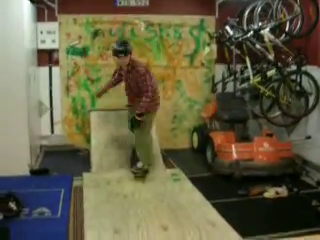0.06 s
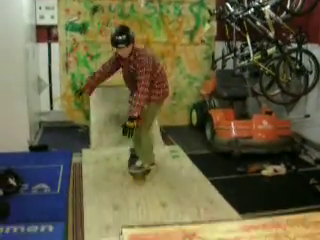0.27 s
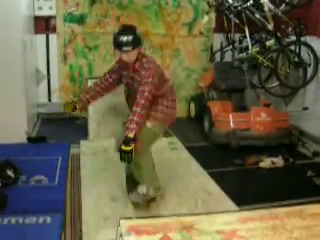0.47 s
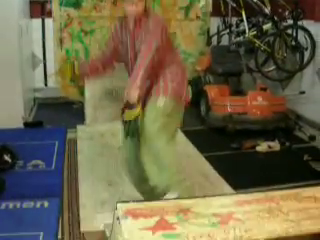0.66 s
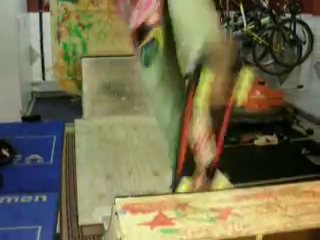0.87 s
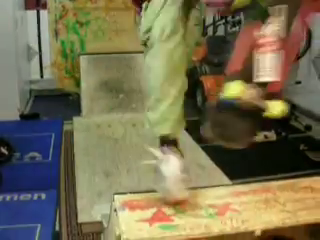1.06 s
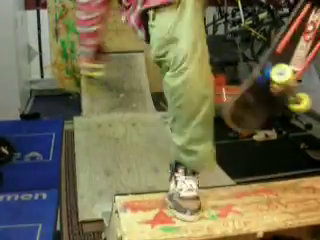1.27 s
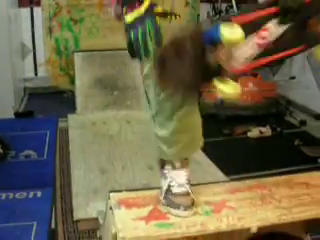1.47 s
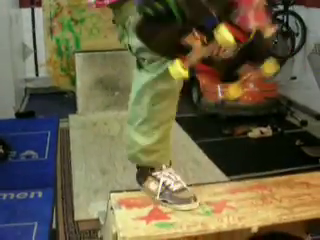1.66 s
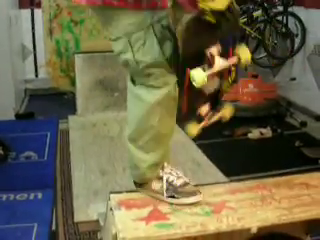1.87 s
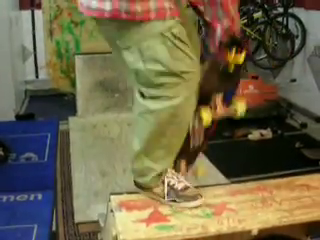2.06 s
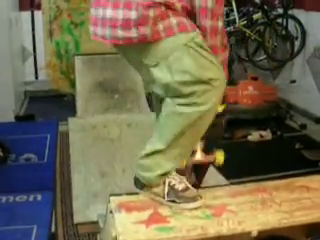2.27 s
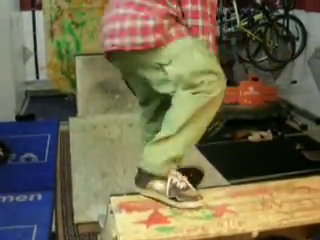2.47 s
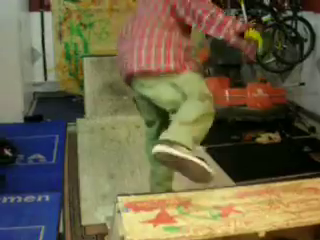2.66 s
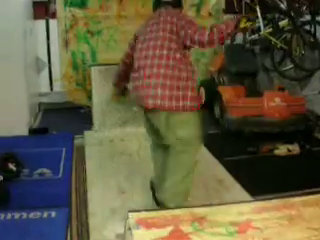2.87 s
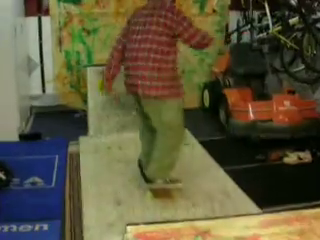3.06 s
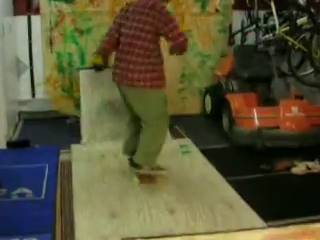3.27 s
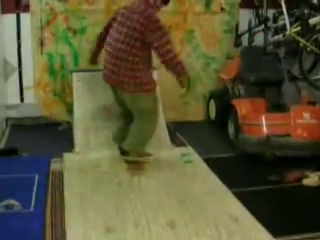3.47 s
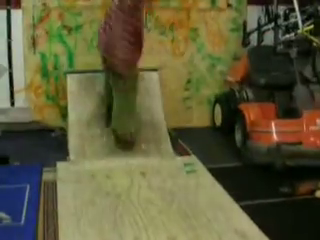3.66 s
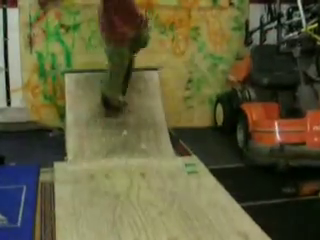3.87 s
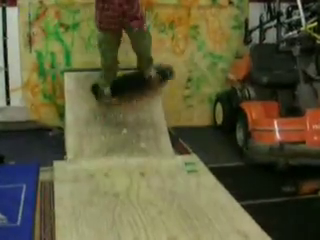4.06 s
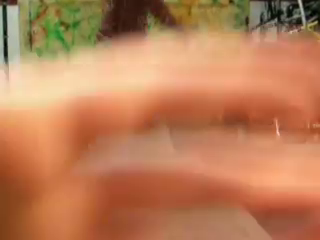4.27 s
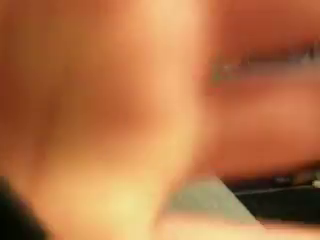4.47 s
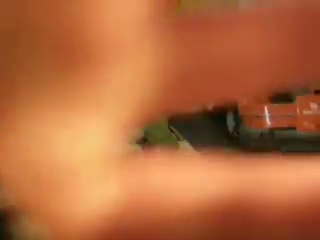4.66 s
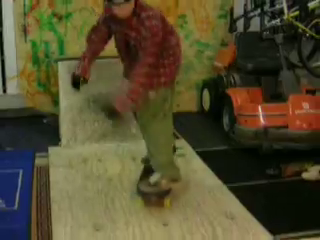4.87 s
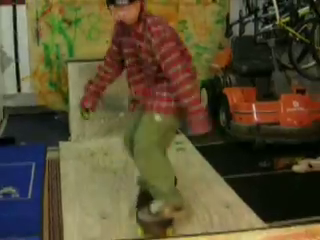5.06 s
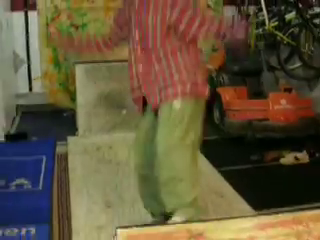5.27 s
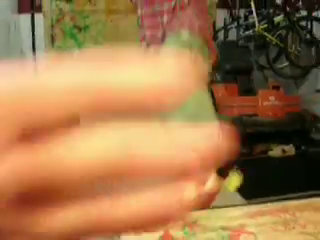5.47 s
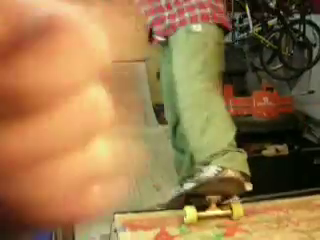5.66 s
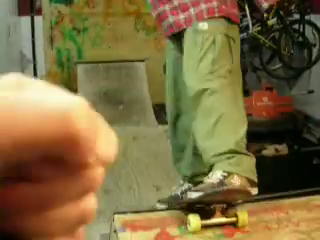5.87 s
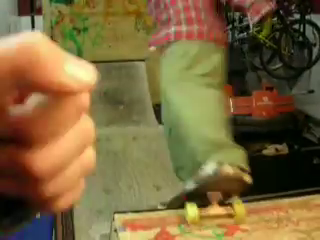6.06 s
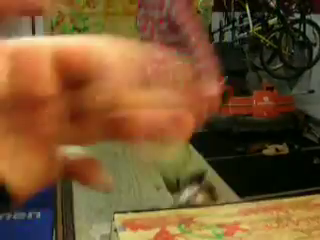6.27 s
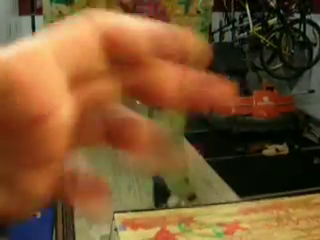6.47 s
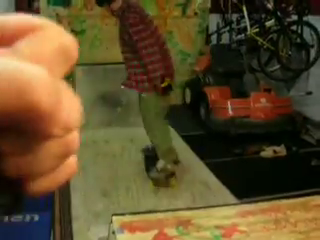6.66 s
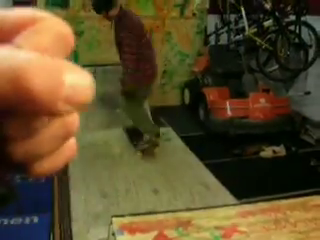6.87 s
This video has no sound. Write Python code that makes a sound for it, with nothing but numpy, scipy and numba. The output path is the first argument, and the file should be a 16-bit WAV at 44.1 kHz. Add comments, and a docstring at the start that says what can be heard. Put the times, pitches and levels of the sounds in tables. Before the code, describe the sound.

Skateboard wheels rumble back and forth over a wooden ramp indoors, with sharp clacks and booming knocks of the board on plywood.

```python
"""Skateboard wheels rumble over plywood and knock across the seams, between two ramps in a garage.
The rider steps onto the platform and picks the board up, wheels still spinning and trucks flopping,
then drops in, turns on the far ramp and stalls on the near edge. Hard contacts crack, ring the maple
deck and boom in the ramp. A narrow-band microphone stands close by and overloads on the hardest knocks."""
import sys
import numpy as np
from scipy import signal
from scipy.fft import rfft, irfft, next_fast_len
from scipy.io import wavfile
from scipy.ndimage import uniform_filter1d
from numba import njit

SR = 44100
rng = np.random.default_rng(int(sys.argv[2]) if len(sys.argv) > 2 else 0)


def generate_wav(signal):
    """Clip the signal to [-1, 1] and save it as 16-bit WAV at the path in sys.argv[1]."""
    frames = np.transpose(np.atleast_2d(signal))
    scaled = np.clip(frames, -1, 1) * 32767
    pcm = np.round(scaled).astype(np.int16)
    wavfile.write(sys.argv[1], SR, pcm)


N = 306054
TIME = np.arange(N) / SR


def undb(db):
    """Decibels to gain."""
    return 10 ** (np.asarray(db) / 20)


def unit(x):
    """Scale to rms 1."""
    return x / np.sqrt(np.mean(x ** 2))


def unit_blow(x):
    """Scale so that the first 20 ms have rms 1."""
    return x / np.sqrt(np.mean(x[:SR // 50] ** 2))


def add(out, start_s, x):
    """Mix x into out, starting at start_s."""
    i = max(int(start_s * SR), 0)
    out[i:i + len(x)] += x[:max(len(out) - i, 0)]


def shape(x, response):
    """Filter x by a function of frequency."""
    size = next_fast_len(len(x) + SR // 4)
    hz = np.maximum(np.fft.rfftfreq(size, 1 / SR), 1)
    return irfft(rfft(x, size) * response(hz), size)[:len(x)]


def colour(x, points):
    """Filter x by a curve through (frequency [Hz], gain [dB]) points."""
    point_hz, db = np.transpose(points)
    return shape(x, lambda hz: undb(np.interp(np.log(hz), np.log(point_hz), db)))


def gate(start, end, rise, fade):
    """Rise, hold until the end, then die away; all in seconds."""
    return np.clip((TIME - start) / rise, 0, 1) * np.exp(-np.maximum(TIME - end, 0) / fade)


def wander(rate_hz):
    """A random drift with a spread near 1."""
    knots = rng.standard_normal(2048)
    return 1.2 * np.interp(TIME * rate_hz, np.arange(len(knots)), knots)


def grit(per_s, spread_db):
    """Tiny contacts at random moments, a few of them much stronger than the rest."""
    happens = rng.random(N) < per_s / SR
    contacts = happens * rng.standard_normal(N)
    strength = undb(spread_db * np.minimum(rng.exponential(size=N), 4))
    return unit(contacts * strength)


def plywood(force, low_cut_hz=190, thud_db=-13):
    """The ramp's sheets ring over the frame's dull thud; the ringing is heard with its deep bass cut."""
    # resonances of the sheets: (frequency [Hz], width [Hz], gain [dB])
    sheet_modes = [(118.6, 4, 7), (194, 6.7, -12.5), (242.5, 69, 6.5), (283.7, 42, 1.5), (316, 51, -0.5),
                   (366, 26, 4), (433.6, 34, 3), (540, 11, -6.5), (540.6, 66, 1.5), (622.5, 6.7, -2.5),
                   (806, 41, -12), (855, 40, -29)]
    # spectrum of the frame: (frequency [Hz], gain [dB])
    frame_colour = [(30, -45.5), (60, -21.5), (90, -3.5), (130, 10), (230, -11), (400, 3), (900, -3.5),
                    (2500, -41.5)]
    rings = sum(undb(db) * signal.lfilter(*signal.iirpeak(hz, hz / width, fs=SR), force)
                for hz, width, db in sheet_modes)
    rings = signal.sosfilt(signal.butter(2, [low_cut_hz, 1100], "band", fs=SR, output="sos"), rings)
    thud = undb(thud_db) * colour(force, frame_colour)
    # bending waves are slower the lower they are, so the bass arrives a few ms late
    return shape(rings + thud, lambda hz: (hz / 1000) ** (-2j * np.pi * 1.6))


def wheels(uneven_db=1.44, touch_s=0.018, spin_rise_s=0.16, spin_stop_s=0.068, run_down_db_per_s=13.5):
    """Wheels on the wood's grain shake the ramp; treads hiss; bearings whirr and run down in the air."""
    # the rider presses into a bend of the ramp: (time [s], half width [s], extra level [dB])
    pushes = [(0.646, 0.07, 9.5), (3.46, 0.11, 8.5), (5.235, 0.041, 10), (6.51, 0.069, 10.5),
              (6.918, 0.12, 9)]
    # wheels down on the wood: (start [s], end [s], fade [s], rumble [dB], whirr [dB], hiss [dB])
    rides = [(0, 0.8, 0.34, -23.5, -33.5, -60), (2.409, 2.565, 0.12, -19.5, -38.5, -24.5),
             (2.791, 3.688, .16, -26.5, -34, -34.5), (3.857, 4.404, 0.019, -46.5, -40, -36.5),
             (4.558, 5.251, 0.016, -23, -29.5, -28), (5.418, 5.686, 0.054, -38.5, -45.5, -36),
             (6.275, 6.937, 0.086, -25.5, -32.5, -31.5)]
    # wheels spinning free: (start [s], end [s], whirr [dB])
    spins = [(1.1, 1.52, -27), (1.496, 2.253, -23), (4.122, 4.366, -36)]
    # spectrum of the bearings: (frequency [Hz], gain [dB])
    bearing_colour = [(200, -38.5), (500, -6), (800, -1), (1100, -2), (1750, -2), (2300, -9.5),
                      (3000, -27.5), (4000, -26.5)]
    # spectrum of the treads on the wood: (frequency [Hz], gain [dB])
    tread_colour = [(900, -29.5), (1800, -6), (2500, 1), (3300, 1.5), (4200, -3.5)]
    weight = undb(sum(db * np.exp(-((TIME - s) / width) ** 2) for s, width, db in pushes))
    rumble, whirr, hiss = sum(np.outer(undb(db), gate(start, end, touch_s, fade))
                              for start, end, fade, *db in rides)
    spin = np.zeros(N)
    for start, end, db in spins:
        run_down_db = run_down_db_per_s * np.maximum(TIME - start, 0)
        spin += gate(start, end, spin_rise_s, spin_stop_s) * undb(db - run_down_db)
    # uneven wheels press harder and softer
    load = undb(uneven_db * wander(rate_hz=45))
    ramp = unit(plywood(grit(per_s=3000, spread_db=1.5) * load))
    bearings = unit(colour(grit(per_s=2500, spread_db=2.5) * load, bearing_colour))
    treads = unit(colour(grit(per_s=3000, spread_db=3) * load, tread_colour))
    return weight * (ramp * rumble + bearings * whirr + treads * hiss) + bearings * spin


def scuffs():
    """Shoes, grip tape and wheels rub: dense slips that swell and die away."""
    # short rubs: (time [s], rise [s], fade [s], level [dB])
    rubs = [(0, 0.0013, 0.049, -16), (1.234, 0.059, 0.018, -20), (1.622, 0.019, 0.036, -22),
            (1.719, 0.034, 0.057, -23.5), (1.947, .021, 0.021, -13.5), (2.691, 0.19, 0.059, -17.5),
            (4.163, 0.044, .045, -19), (5.6, .01, 0.032, -34), (6.099, 0.0034, 0.038, -21)]
    # spectrum of a rub: (frequency [Hz], gain [dB])
    rub_colour = [(100, -33.5), (250, -6.5), (650, -7), (1100, -6), (1700, -9.5), (2500, -8), (3300, -18.5),
                  (4200, -13)]
    pressure = sum(undb(db) * gate(s, s + rise, rise, fade) for s, rise, fade, db in rubs)
    return pressure * unit(colour(grit(per_s=2500, spread_db=2.5), rub_colour))


def room_tone(level_db=-38):
    """The garage's faint, even hush under everything."""
    # spectrum of the hush: (frequency [Hz], gain [dB])
    hush_colour = [(40, -23), (150, -12.5), (280, -0.5), (420, -7.5), (650, -7.5), (900, -9), (2000, -12.5),
                   (4000, -12)]
    return undb(level_db) * unit(colour(rng.standard_normal(N), hush_colour))


def burst(t, length_s):
    """A short scatter of contacts that holds every frequency about equally."""
    envelope = np.exp(-(t / length_s) ** 1.5)
    spectrum = rfft(rng.standard_normal(len(t)) * envelope)
    return irfft(spectrum / abs(spectrum), len(t)) * np.sqrt(envelope)


def ring(t, modes, detune=0, onset_s=.001):
    """Struck modes die away from random phases; detune is their relative scatter in pitch."""
    hz, db, t60 = np.transpose(modes)[:, :, None]
    if detune:
        hz = hz * (1 + detune * rng.standard_normal(hz.shape))
    swing = np.sin(2 * np.pi * (hz * t + rng.random(hz.shape)))
    decay = undb(db - 60 * t / t60)
    return unit_blow(np.sum(decay * swing, axis=0) * np.minimum(t / onset_s, 1))


def knocks(push_s=0.026, shake_db=-26, rattle_s=.014):
    """Each blow cracks at the contact, rings the deck and pushes the ramp; loose trucks chatter after."""
    # wheels and deck striking the wood:
    # (time [s], clack [dB], deck ring [dB], ramp boom [dB], crack [dB], rattle share [0-1])
    blows = [(0.0679, -12, -20, -12.5, -33, .3), (0.0831, -15, -12.5, -6.5, -32, .65),
             (0.1755, -12, -14, -22, -27, 0.75), (0.2689, -15, -11.5, -25, -30, 0.2),
             (0.435, -34, -18.5, -12.5, -38, 0.2), (0.5471, -25.5, -13.5, -11.5, -33.5, 0.1),
             (0.6848, -15, -12, -12.5, -9, 0.06), (0.7621, -25.5, -15.5, -20, -35, 0.2),
             (0.892, -13.5, -22.5, -24, -20.5, 0.2), (1, -17, -18, -24.5, -37.5, 0.76),
             (1.046, -21, -23, -18, -28.5, 0.78), (2.2665, -10, -11, -9, -10, 0.41),
             (2.3349, -30.5, -19, -16.5, -25, .5), (2.4094, -17, -20, -20, -14.5, 0.82),
             (2.526, -23, -18, -19.5, -15.5, 0.8), (2.5433, -15.5, -20.5, -23.5, -20.5, 0.3),
             (2.8543, -33, -16, -15, -12, .2), (2.983, -20, -22.5, -19.5, -15.5, 0.99),
             (3.488, -16.5, -17, -17.5, -36.5, 0.15), (3.5879, -15, -18, -31, -4.5, 0.7),
             (3.703, -20, -18, -29, -10.5, 0.77), (4.4002, -15, -28.5, -19, -9, 0.54),
             (4.4165, -20.5, -20.5, -15, -14.5, 0), (4.591, -18.5, -18, -15, -15.5, 0.22),
             (4.6094, -31, -25, -17.5, -14, 0.8), (4.7248, -12, -12, -23, -30, 0),
             (4.9429, -20.5, -34.5, -13, -35, .2), (5.1015, -22, -34, -16.5, -26, 0.8),
             (5.2035, -21.5, -18.5, -13, -28, 0.43), (5.2787, -28, -20, -38, -8, 0.2),
             (5.3815, -24.5, -20.5, -22.5, -10, 0), (5.7355, -16.5, -14.5, -21.5, -6.5, .04),
             (6.1343, -25.5, -16, -24, -26.5, 0.6), (6.257, -16, -16.5, -21, -16, 0.2),
             (6.297, -17, -22.5, -14.5, -13.5, 0.54), (6.4868, -24, -19.5, -13.5, -23.5, .9),
             (6.5892, -20.5, -22, -13.5, -16.5, 0.1)]
    # bending modes of the maple deck: (frequency [Hz], level [dB], t60 [s])
    deck_modes = [(605, -13.5, 0.17), (675, 5.5, 0.041), (816, 8, 0.018), (1049, -10, 0.1)]
    # upper modes of wood and trucks, too close to tell apart: (frequency [Hz], gain [dB])
    clack_colour = [(300, -31.5), (700, 5), (1000, 2.5), (1400, 2), (1900, -1), (2600, -8.5), (3100, -22.5),
                    (3800, -19)]
    # spectrum of the hard contact: (frequency [Hz], gain [dB])
    crack_colour = [(600, -34.5), (1400, -7.5), (2200, -6), (2800, -6), (3400, -6.5), (4200, -4)]
    out, t = np.zeros(N), np.arange(8192) / SR
    for s, clack_db, ring_db, boom_db, crack_db, rattle in blows:
        chatter_s = np.cumsum(rattle_s * (.5 + rng.random(2)) / 2)
        for delay, share in zip([0, *chatter_s], [1, rattle, rattle ** 2]):
            # the rider's weight and the place of the blow shift the modes from contact to contact
            deck = undb(ring_db) * ring(t, deck_modes, detune=.06)
            clack = undb(clack_db) * unit_blow(colour(burst(t, length_s=.016), clack_colour))
            crack = undb(crack_db) * unit_blow(colour(burst(t, length_s=.006), crack_colour))
            add(out, s + delay, share * (deck + clack + crack))
        # one sharp push, then the sheet shakes against its frame
        force = (t == 0) + undb(shake_db) * rng.standard_normal(len(t)) * np.exp(-t / push_s)
        add(out, s, undb(boom_db) * unit_blow(plywood(force)))
    return out


def steps(sole_s=0.027):
    """Soft soles push the plywood slowly, without a clack."""
    # shoes coming down on the platform: (time [s], level [dB])
    footfalls = [(1.089, -31.5), (1.28, -30.5), (1.628, -28), (1.795, -25.5), (1.96, -28)]
    out, t = np.zeros(N), np.arange(SR // 4) / SR
    for s, db in footfalls:
        force = rng.standard_normal(len(t)) * np.exp(-t / sole_s)
        add(out, s, undb(db) * unit_blow(plywood(force)))
    return out


def truck_clunks():
    """Each flop rings a loose truck; the rubber bushing softens the start."""
    # trucks flopping over as the board swings in the hands: (time [s], level [dB])
    flops = [(1.7965, -15.5), (1.8105, -18.5), (1.837, -19.5)]
    # modes of a truck on the free deck: (frequency [Hz], level [dB], t60 [s])
    truck_modes = [(653, -1.5, 0.027), (893, -3, 0.05), (960, 0.5, 0.021), (1194, 0, 0.026),
                   (1425, -9, 0.078), (1717, -7.5, 0.047), (1830, -19, 0.021)]
    out, t = np.zeros(N), np.arange(SR // 8) / SR
    for s, db in flops:
        add(out, s, undb(db) * ring(t, truck_modes))
    return out


def reflections(build_s=0.012):
    """A dense run of echoes off the walls, strongest and longest in the low mids."""
    # reverberation of the garage: (frequency [Hz], t60 [s], level [dB])
    reverberation = [(150, 0.23, -4), (402, 0.78, 2), (990, 0.52, -1.5), (2800, 0.43, -2)]
    point_hz, t60, db = np.transpose(reverberation)
    t = np.arange(int(.7 * SR)) / SR
    noise, out = rng.standard_normal(len(t)), 0
    for centre in 125 * 2. ** np.arange(6):
        octave = shape(noise, lambda hz: np.maximum(1 - abs(np.log2(np.clip(hz, 125, 4000) / centre)), 0))
        band_t60, band_db = (np.interp(np.log(centre), np.log(point_hz), column) for column in (t60, db))
        decay = undb(-60 * t / band_t60) * np.minimum(t / build_s, 1)
        out = out + undb(band_db) * octave * decay / np.sqrt(np.sum(decay ** 2))
    return out


def garage(x, wet_db=-1, places=8):
    """As the board travels, one pattern of wall reflections gives way to the next."""
    position, wet = np.linspace(0, places - 1, N), np.zeros(N)
    for place in range(places):
        nearness = np.sqrt(np.maximum(1 - abs(position - place), 0))
        wet += signal.oaconvolve(x * nearness, reflections())[:N]
    return x + undb(wet_db) * wet


def scene():
    """Board, shoes and ramp from close by, with the garage around them, in mono."""
    direct = wheels() + scuffs() + steps() + truck_clunks() + knocks()
    return (garage(direct) + room_tone())[None]


@njit
def follower(x, attack_s, release_s):
    """Envelope that rises over attack_s and falls over release_s."""
    attack, release = 1 / (attack_s * SR), 1 / (release_s * SR)
    out, level = np.empty(len(x)), 0.
    for i in range(len(x)):
        level += (abs(x[i]) - level) * (attack if abs(x[i]) > level else release)
        out[i] = level
    return out


def record(dry, limit_db=-7, offset=-.0216, ceiling=.72, top_hz=15900):
    """The microphone ends near 4 kHz; first peaks slip past a limiter; an off-centre converter clips."""
    # response of the microphone channel: (frequency [Hz], gain [dB])
    mic_response = [(3000, 0), (3400, -2), (3700, -8), (4000, -17), (4250, -31), (4500, -62), (4750, -120)]
    picked_up = colour(dry[0], mic_response)
    envelope = follower(picked_up, attack_s=0.0016, release_s=0.055)
    gain = uniform_filter1d(1 / np.maximum(envelope / undb(limit_db), 1), size=64)
    clipped = np.clip(picked_up * gain + offset, -ceiling, ceiling)
    # a duller top takes the edge off the clipped peaks
    dulled = colour(clipped, [(4000, 0), (4800, -3.5), (15000, -4.5)])
    return signal.sosfilt(signal.ellip(8, .2, 70, top_hz, fs=SR, output="sos"), dulled)[None]


dry = scene()
out = record(dry)
generate_wav(out)
```